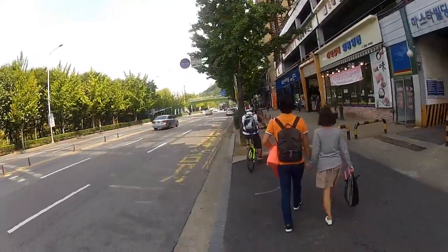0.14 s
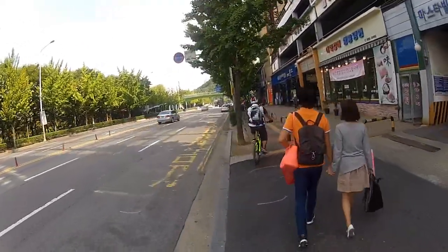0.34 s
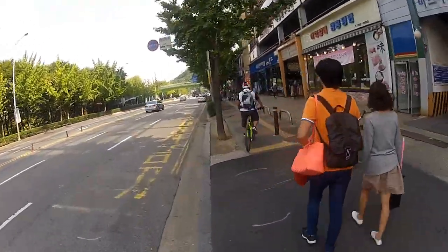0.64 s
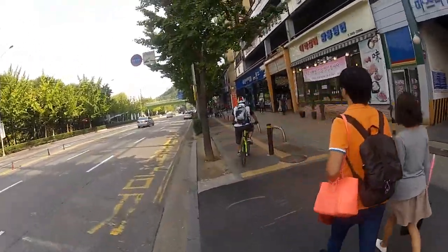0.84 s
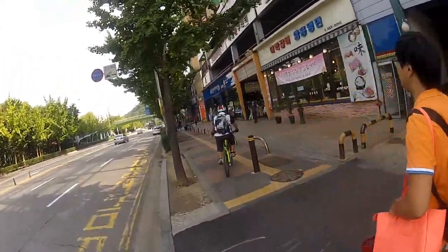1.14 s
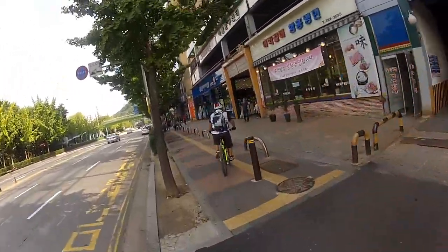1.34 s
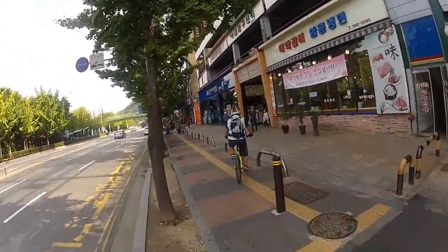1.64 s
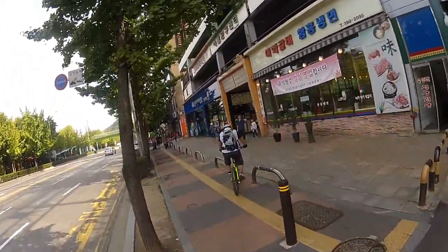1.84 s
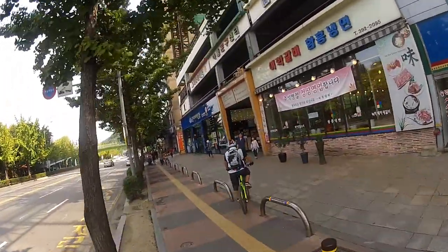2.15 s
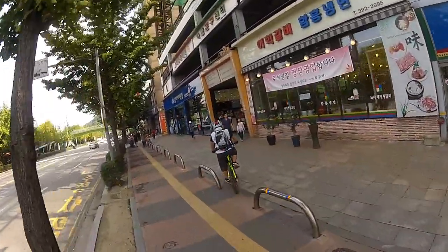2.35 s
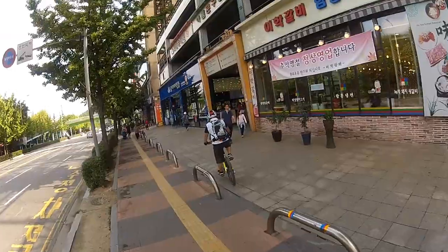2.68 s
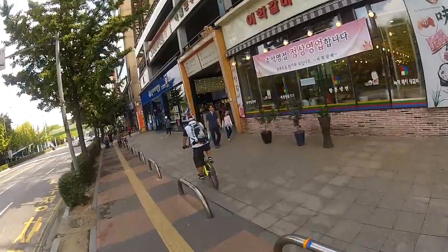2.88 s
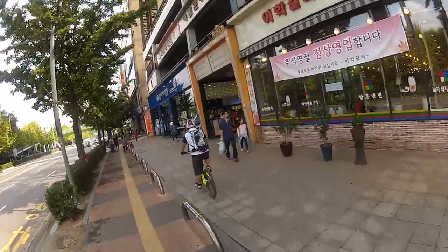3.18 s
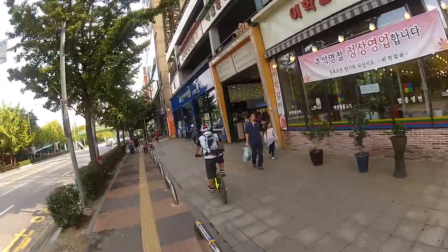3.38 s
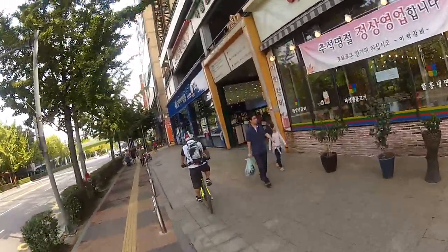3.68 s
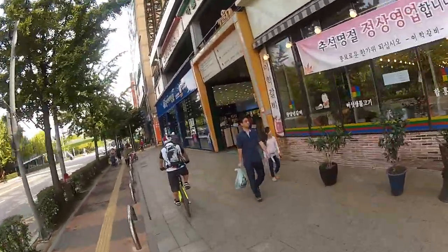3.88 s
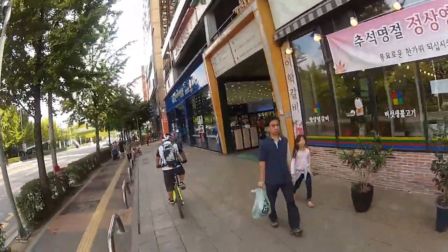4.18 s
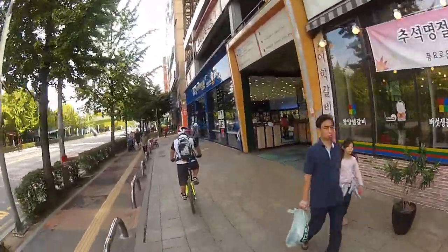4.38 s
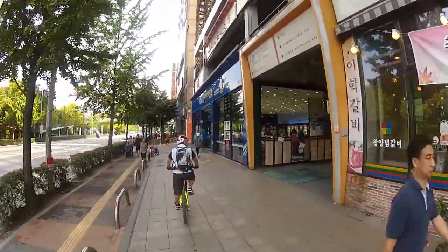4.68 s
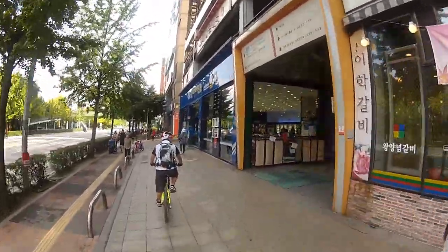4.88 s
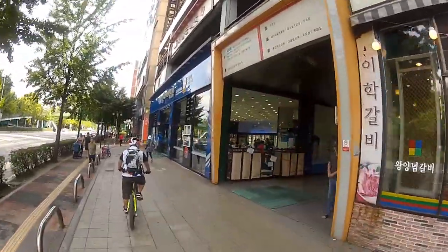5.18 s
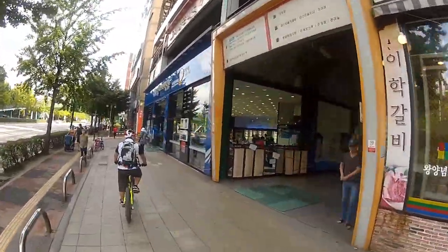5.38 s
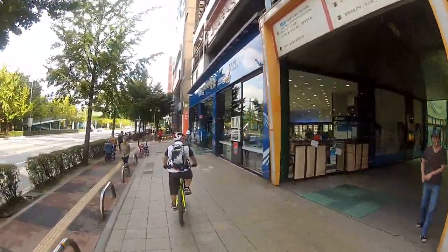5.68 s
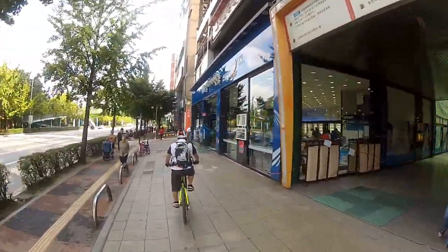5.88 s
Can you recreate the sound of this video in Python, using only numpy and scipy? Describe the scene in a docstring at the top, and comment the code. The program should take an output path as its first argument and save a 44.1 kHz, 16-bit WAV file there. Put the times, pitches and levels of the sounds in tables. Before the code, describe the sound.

Hard plastic knocks crack out as a bicycle-mounted camera rattles over paving, above faint loose ticking, low shudders, fading tyre roar and muffled wind.

```python
"""Camera in a case on a bicycle

A camera in a plastic case rides over paving stones. Knocks ring the case, a loose part ticks and bounces,
wheels thud into joints and the mount shudders low: short pushes and dying tones placed by tables.
Shaped noise makes the fading tyre and street roar, the wind and a faint noise floor; a faint whistle
glides mostly up. The recorder holds each sample for a while, which mirrors all sound around the hold rate.
"""
import sys
import numpy as np
from scipy import signal
from scipy.fft import rfft, irfft, next_fast_len
from scipy.io import wavfile
from scipy.ndimage import uniform_filter1d

SR = 44100
rng = np.random.default_rng(int(sys.argv[2]) if len(sys.argv) > 2 else 0)


def persist_wave(psi):
    """Save psi, clipped to +-1, as 16-bit WAV."""
    counts = np.round(np.clip(psi, -1, 1) * 32767).astype(np.int16)
    wavfile.write(sys.argv[1], SR, np.atleast_2d(counts).T)


N = 265903  # length in samples, about 6 s

# Source levels are before the recorder; the noise floor is added after the hold.
# Blows on the case: start_s, peak_db (of the ringing), contact_ms, pitch_factor
KNOCK_EVENTS = [(0.5474, -31, 1.16, 1.06), (0.8179, -19.5, 0.56, 1.001), (0.9817, -13, 0.49, 1.001),
                (1.0345, -38, 0.89, 0.92), (1.7012, -35.5, 0.66, 1.2), (1.8127, -38.5, 0.74, 0.92),
                (1.9356, -2, 0.1, 1.007), (2.0403, -5.5, 0.21, .99), (2.1947, -24, 0.74, .98),
                (2.396, -0.6, 0.16, 1.015), (3.3875, -5, 0.23, 1.003), (3.6356, -0.1, 0.14, 1.023),
                (3.789, -11, 0.32, 1.003), (3.918, -36.5, 0.95, 0.7), (4.8276, -10.5, 0.35, 0.999),
                (4.907, -45, 0.7, 0.9)]
# Tones the case rings with: pitch_hz (before the pitch factor),
# relative strength (its sign is the way the wall first moves), t60_s (time to fade by 60 dB)
CASE_TONES = [(281, .07, .022), (804, .2, .0195), (1026, .425, .0134), (1361, -1.23, .0061),
              (1441, -.126, .027), (1887, 2.5, .0048), (1985, -1.85, .0078), (2084, 1.47, .0177),
              (2218, -1.36, .019), (2290, 1.13, .004), (2424, -.48, .0145), (655, .026, .07),
              (2170, .03, .045), (2750, .03, .016), (3580, -.1, .013), (4460, -.1, .006),
              (5150, -.04, .014)]
# Ticks of the loose part: start_s, peak_db,
# bounce_ms (time to the first bounce; 0 = it stays down, below 0 = the weaker hits come before the main one)
TICK_EVENTS = [(0.0221, -34, 9.5), (0.2172, -33.5, 8), (0.4759, -34, 9.5), (0.6013, -42, 0),
               (0.8244, -33, 7), (1.034, -41, 1.5), (1.1474, -34.5, 13), (1.4261, -34.5, 8.5),
               (1.7286, -34.5, 0.5), (1.8134, -40, 1), (1.9298, -40, 1.5), (2.0077, -35.5, 10.6),
               (2.5768, -34, 6.9), (2.682, -43, -2.5), (2.823, -35, 9.5), (2.9043, -42.5, 1.5),
               (3.0118, -35.5, 9.5), (3.2954, -36.5, 15), (3.3784, -35, 1), (3.5146, -38, -0.5),
               (3.5848, -34.5, 10.5), (3.739, -38.5, 1), (3.7803, -36, 2), (4.0432, -33.5, 8),
               (4.3268, -38, 0), (4.4875, -42, 14), (4.5909, -35.5, 10.5), (4.7673, -38, 19.5),
               (5.0819, -35.5, 11.5), (5.5803, -37.5, 16.5), (5.8572, -35, 11)]
# Tones the loose part rings with: pitch_hz, relative signed strength, t60_s
PART_TONES = [(372, 0.23, 0.011), (960, 0.12, 0.019), (1710, 0.95, 0.0025), (2453, 0.47, 0.015),
              (3006, -0.43, 0.02), (3680, 0.1, .008), (5250, 0.35, 0.0024)]
# Dull thuds when a wheel drops into a joint: start_s, peak_db, length_ms (time scale of the push)
THUD_EVENTS = [(0.546, -34.5, 1.4), (0.6, -30.5, 2.7), (1.035, -39, 3.8), (1.277, -37.5, 0.81),
               (1.631, -38.7, 5), (1.703, -30, 4), (1.716, -35, 8.4), (1.813, -45, 3.5), (2.577, -52, 2.5),
               (2.682, -37, 2.6), (3.919, -34.5, 4.8), (4.042, -38.5, 2.5), (4.906, -39.5, 2.4)]
# Shudders of the mount after bumps: start_s, level_db (before fade-in and decay), pitch_hz
JOLT_EVENTS = [(0.006, -38, 40.3), (0.18, -40, 39), (0.294, -39, 36.3), (0.552, -36, 70),
               (0.583, -37, 38.2), (0.618, -29, 30), (0.785, -41, 37.4), (0.999, -29, 50),
               (1.077, -32.5, 50.3), (1.11, -36.5, 71), (1.285, -26, 51.3), (1.576, -31, 50),
               (1.623, -38.5, 83), (1.672, -21, 53.3), (1.693, -22.5, 78), (1.719, -31, 50),
               (1.81, -27.5, 51.6), (1.89, -37, 43), (1.953, -29.5, 46.5), (2.042, -29, 47.3),
               (2.189, -34, 51), (2.389, -37, 78), (2.429, -38.5, 46.8), (2.527, -32, 47.7),
               (2.562, -34, 51.5), (2.688, -35.5, 57.7), (2.734, -38.5, 36.5), (2.888, -40, 93),
               (2.905, -31.5, 54.3), (2.96, -40, 45.4), (3.348, -40, 47), (3.405, -39, 47.6),
               (3.551, -37, 32), (3.619, -37, 93), (3.641, -36, 56), (3.696, -35.5, 50.3), (3.877, -35, 66),
               (3.94, -40, 37.8), (4.059, -41, 35.5), (4.228, -35, 54.4), (4.715, -44.5, 50.3),
               (4.824, -40.5, 52), (4.911, -43, 55)]
# Tyre and street roar, fading as the road falls behind: time_s, level_db
ROAR_LEVEL = [(0, -51.5), (1.5, -51.5), (2.4, -54.5), (3.3, -54.5), (4.4, -58), (6.03, -58.5)]
# Wind and hum along the ride: time_s, wind_db, hum_lift_db (lift of the hum's band within the roar)
RIDE_LEVELS = [(0.0, -53.5, 4), (0.6, -55, 4.5), (1.21, -47.5, 12), (1.45, -52.5, 12), (1.81, -48.5, 9),
               (2.15, -51.5, 7), (2.45, -56, 7), (2.59, -50, 9.5), (2.95, -54.5, 4.5), (3.26, -47, 13),
               (3.79, -53, 0.5), (4.2, -53, 7), (4.53, -58, 1.5), (5.34, -58, 2.5), (5.71, -58, 6),
               (6.03, -55.5, 1)]
# Rough and smooth tone colours of the roar: pitch_hz, relative_db
ROUGH_COLOUR = [(50, -28), (130, -14.5), (380, -6), (530, -17.5), (800, -3), (1800, -2), (2600, -8),
                (3000, -20.5), (4000, -27), (5300, -35.5), (7000, -59)]
SMOOTH_COLOUR = [(50, -33.5), (130, -2.5), (380, -10.5), (600, -19), (1200, -26.5), (1800, -20.5),
                 (2600, -20.5), (3000, -31), (4000, -24), (5300, -25), (7000, -57)]
# Narrow bands of the roar lifted by the air and walls of the closed case: pitch_hz, width_hz, lift_db
CAVITY_BANDS = [(1033, 28, 5.5), (1370, 180, 3), (1700, 72, 3.5), (2115, 58, 5), (2800, 100, 2.5),
                (3170, 110, 6), (3560, 130, 5)]
# Tone colour of the wind: pitch_hz, relative_db
WIND_COLOUR = [(6, -27), (12, -7), (25, 5.5), (50, -6.5), (90, -9.5), (150, -10.5), (300, -26), (600, -53)]
# Path of the faint whistle: time_s, pitch_hz, level_db (of its fuzzy noise)
WHISTLE_PATH = [(1.438, 2830, -76), (1.52, 3030, -60), (1.618, 3100, -61.5), (1.75, 3280, -70),
                (1.83, 3250, -68)]
# Tone colour of the faint noise floor, low rumble plus hiss: pitch_hz, relative_db
FLOOR_COLOUR = [(20, 22.5), (60, 1), (300, 11.5), (1000, -23.5), (5000, -2), (15000, -28)]

LOW_HZ, LOW_TONES_DB = 1500, -0.15  # a blow stirs the case tones below this pitch slightly less
FIRST_BOUNCE_DB, SECOND_BOUNCE_DB = -3, -7.5  # before a little chance is added
REBOUND = 0.54  # the second flight is this share of the first
# Swings until a jolt is 60 dB down; hard jolts slip and settle sooner
SWINGS, SWINGS_PER_DB, SWINGS_AT_DB = 7.6, 0.62, -27.5
# Share of the rough colour: the louder the roar, the rougher
ROUGH_SHARE, ROUGH_AT_DB, SHARE_PER_DB = 0.65, -51.5, 0.05
HUM_HZ, HUM_WIDTH_HZ = 653, 72
HOLD_HZ, EDGE_HZ, FLOOR_DB = 12000, 15800, -77  # hold rate, top of the final band, floor before that limit


def gain_of(db):
    """Turns decibels into a gain."""
    return 10 ** (np.asarray(db) / 20)


def evened(x):
    """Scales a signal to an average (rms) level of 1."""
    return x / np.sqrt(np.mean(x ** 2) + 1e-20)


def read(points, hz):
    """Reads a tone colour between its points, on a log-pitch axis."""
    f, value = np.transpose(points)
    return np.interp(np.log(hz + 1), np.log(f + 1), value)


def curve(rows, column, s):
    """Reads one column of a time table at the times s."""
    columns = np.transpose(rows)
    return np.interp(s, columns[0], columns[column])


def add(mix, s, sound):
    """Mixes a sound in, starting at s seconds."""
    part = mix[round(s * SR):][:len(sound)]
    part += sound[:len(part)]


def ring(tones, contact_ms, pitch):
    """Dying tones driven by one smooth push; a longer push sounds duller. The peak is 1."""
    t = np.arange(SR // 10) / SR
    push_phase = np.clip(t[:SR // 200] * 1000 / max(contact_ms, .06), 0, 1)
    push = np.sin(np.pi * push_phase) ** 2
    free = np.zeros(len(t))
    for hz, strength, t60 in tones:
        free += strength * gain_of(-60 * t / t60) * np.sin(2 * np.pi * hz * pitch * t)
    sound = np.convolve(free, push)
    return sound / abs(sound).max()


def noise(colour, patchy_db, flicker_db, size):
    """Noise from random short spectra: colour(hz, s) in dB, drifting patches, and flicker shared by all pitches."""
    hop = size // 4
    frames, hz = N // hop + 5, np.fft.rfftfreq(size, 1 / SR)
    real, imaginary, patches = rng.standard_normal((frames, len(hz), 3)).T
    patches = uniform_filter1d(patches, size=4, axis=0)  # smooth over pitch
    patches = evened(uniform_filter1d(patches, size=8, axis=1))  # smooth over time
    flicker = evened(uniform_filter1d(rng.standard_normal(frames), size=3))
    shape = gain_of(colour(hz[:, None], np.arange(frames) * hop / SR))
    shape = shape / np.sqrt((shape ** 2).sum(0))  # colour changes alone do not change loudness
    unevenness = gain_of(patchy_db * patches + flicker_db * flicker)
    spectra = (real + 1j * imaginary) * shape * unevenness
    return evened(signal.istft(spectra, nperseg=size, noverlap=size - hop)[1][:N])


def knocks():
    """The camera hits the front or back of its case, which rings; the latch buzz grows steeply with the blow."""
    out = np.zeros(N)
    sides = rng.choice([-1., 1.], len(KNOCK_EVENTS))
    t = np.arange(SR // 80) / SR
    # Differencing the noise twice makes it bright
    buzzes = np.diff(rng.standard_normal((len(KNOCK_EVENTS), len(t) + 2)), 2)
    buzz_start = 1 - np.exp(-t / 0.00087)
    tones = [(hz, strength * gain_of(LOW_TONES_DB * (hz < LOW_HZ)), t60) for hz, strength, t60 in CASE_TONES]
    for (s, db, contact_ms, pitch), side, buzz in zip(KNOCK_EVENTS, sides, buzzes):
        add(out, s, side * gain_of(db) * ring(tones, contact_ms, pitch))
        add(out, s, gain_of(3.4 * db - 9.0 - 60 * t / 0.013) * buzz * buzz_start)
    return out


def ticks():
    """Each tick rings the loose part a little differently; most have two weaker bounces, the second flight shorter."""
    out = np.zeros(N)
    chance = rng.standard_normal((len(TICK_EVENTS), 3, 3))
    for (s, db, bounce_ms), draws in zip(TICK_EVENTS, chance):
        hits = [(0, 0)]
        if bounce_ms:
            hits += [(bounce_ms, FIRST_BOUNCE_DB), (bounce_ms * (1 + REBOUND), SECOND_BOUNCE_DB)]
        for (ms, loss_db), (soft, tune, vary) in zip(hits, draws):
            level = gain_of(db + loss_db + (ms > 0) * 1.2 * vary)
            hit = ring(PART_TONES, contact_ms=0.18 + 0.037 * soft, pitch=1 + 0.023 * tune)
            add(out, s + ms / 1000, -level * hit)
    return out


def thuds():
    """A wheel drops into a joint: one low push and its rebound, too slow to ring the case."""
    out, t = np.zeros(N), np.arange(SR // 20) / SR
    for s, db, length_ms in THUD_EVENTS:
        u = t * 1000 / max(length_ms, .2)
        push = u * (1 - u / 2) * np.exp(-u)
        add(out, s, -gain_of(db) * push / push.max())
    return out


def jolts():
    """The mount swings a few times at a low pitch and settles."""
    out, t = np.zeros(N), np.arange(SR // 3) / SR
    fade_in = 1 - np.exp(-t / 0.0032)
    for s, db, hz in JOLT_EVENTS:
        t60 = max(SWINGS - SWINGS_PER_DB * (db - SWINGS_AT_DB), 2) / hz
        add(out, s, gain_of(db - 60 * t / t60) * np.sin(2 * np.pi * hz * t) * fade_in)
    return out


def roar():
    """Tyre and street noise through the case, with grit that taps it faintly."""
    def colour(hz, s):
        """Mixes rough and smooth colours, then lifts the case's bands and the hum."""
        rough = ROUGH_SHARE + SHARE_PER_DB * (curve(ROAR_LEVEL, column=1, s=s) - ROUGH_AT_DB)
        rough = np.clip(rough, 0, 1)
        lift = sum(db / (1 + ((hz - f) / width) ** 2) for f, width, db in CAVITY_BANDS)
        hum = curve(RIDE_LEVELS, column=2, s=s) / (1 + ((hz - HUM_HZ) / HUM_WIDTH_HZ) ** 2)
        return rough * read(ROUGH_COLOUR, hz) + (1 - rough) * read(SMOOTH_COLOUR, hz) + lift + hum

    tap_levels = gain_of(4.3 * np.minimum(rng.exponential(1, N), 2.5))
    tap_times = rng.random(N) < 50 / SR  # about 50 taps a second
    taps = tap_levels * tap_times * rng.choice([-1., 1.], N)
    grit = signal.oaconvolve(taps, ring(CASE_TONES, contact_ms=0.19, pitch=1.2))[:N]
    level = gain_of(curve(ROAR_LEVEL, column=1, s=np.arange(N) / SR))
    road = noise(colour, patchy_db=2.2, flicker_db=0.6, size=1024)
    return level * (road + gain_of(-16.5) * evened(grit))


def wind():
    """Lumpy low pressure on the microphone port, made from uneven low noise."""
    gusts = noise(lambda hz, s: read(WIND_COLOUR, hz) + 0 * s, patchy_db=2.5, flicker_db=2.5, size=2048)
    return gain_of(curve(RIDE_LEVELS, column=1, s=np.arange(N) / SR)) * gusts


def whistle():
    """A fuzzy tone: slow noise carried on a gliding pitch."""
    s, hz, db = np.transpose(WHISTLE_PATH)
    t = np.arange(s[0], s[-1], 1 / SR)
    slowness = np.exp(-np.pi * 70 / SR)  # keeps the noise slow, about 70 Hz wide around the tone
    fuzz = evened(signal.lfilter([1], [1, -slowness], rng.standard_normal(len(t))))
    tone = np.sin(2 * np.pi * np.cumsum(np.interp(t, s, hz)) / SR)
    out = np.zeros(N)
    add(out, s[0], gain_of(np.interp(t, s, db)) * fuzz * tone)
    return out


def scene():
    """One microphone feeds both channels with the sum of all sources."""
    mono = knocks() + ticks() + thuds() + jolts() + roar() + wind() + whistle()
    return np.tile(mono, (2, 1))


def record(dry):
    """Low-pass, overload, sample and hold, faint noise, then a band limit."""
    x = signal.oaconvolve(dry, signal.firwin(121, 5800, fs=SR)[None], "same")
    x = np.clip(x, -.76, .76)  # the loudest knocks overload the input
    # Sampling mirrors the spectrum around the hold rate
    x = x * (1 + 2 * gain_of(0.5) * np.cos(2 * np.pi * HOLD_HZ * np.arange(N) / SR))
    size = next_fast_len(N)
    held = np.sinc(np.fft.rfftfreq(size, 1 / SR) / HOLD_HZ)  # holding is a running mean over one period
    x = irfft(rfft(x, size) * held, size)[:, :N]
    # Each channel has its own faint noise
    floor = [noise(lambda hz, s: read(FLOOR_COLOUR, hz) + 0 * s, patchy_db=0, flicker_db=0, size=1024) for _ in x]
    x = x + gain_of(FLOOR_DB) * np.array(floor)
    band_limit = signal.firwin(301, EDGE_HZ, window=("kaiser", 8), fs=SR)
    return signal.oaconvolve(x, band_limit[None], "same")


dry = scene()
out = record(dry)
persist_wave(out)
```